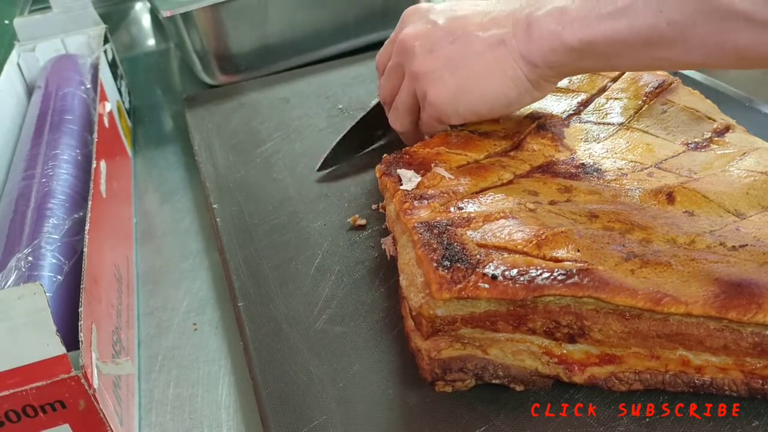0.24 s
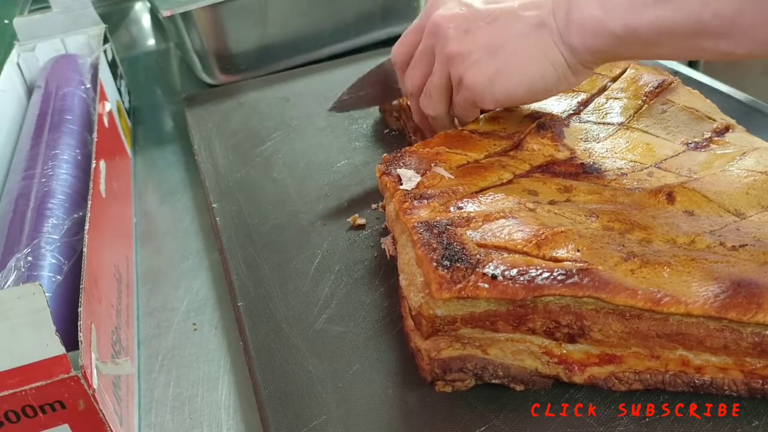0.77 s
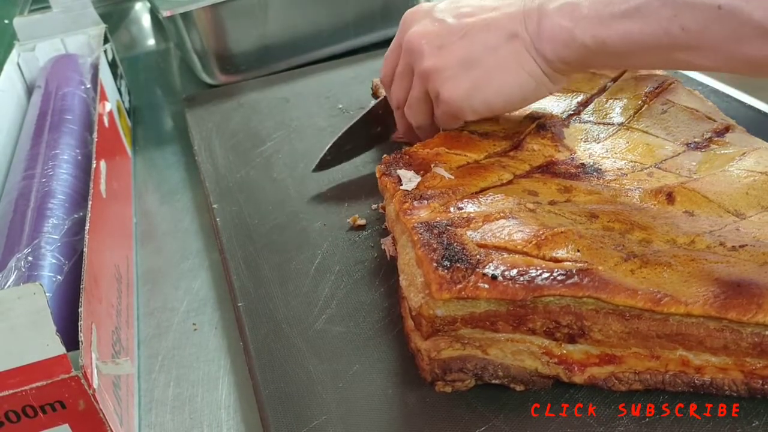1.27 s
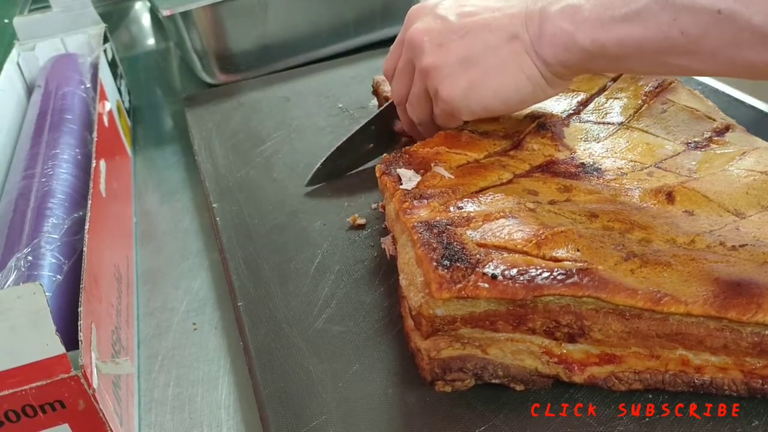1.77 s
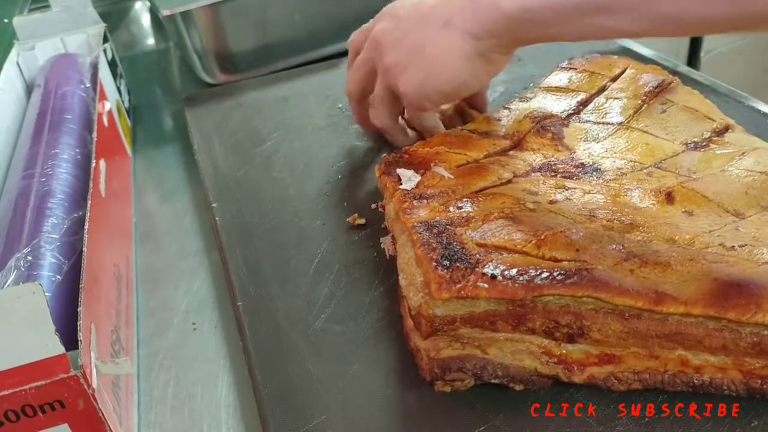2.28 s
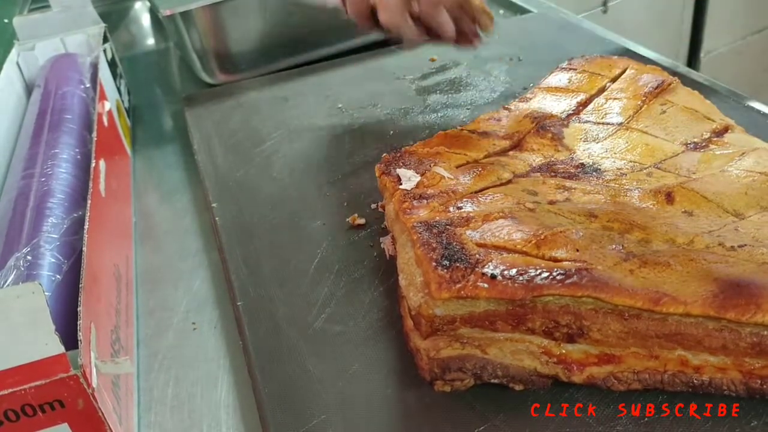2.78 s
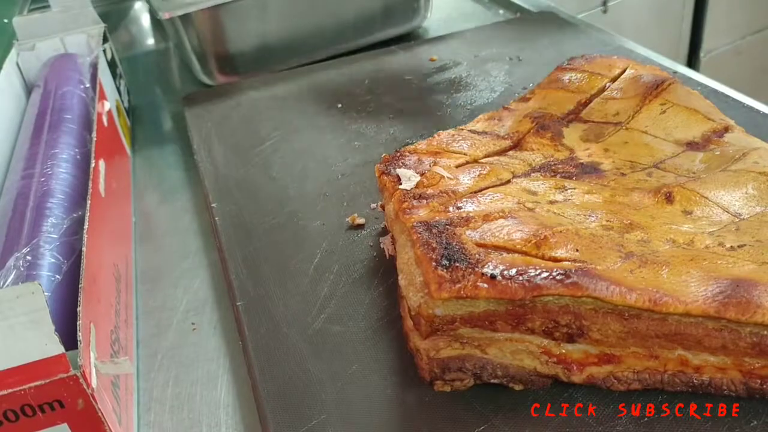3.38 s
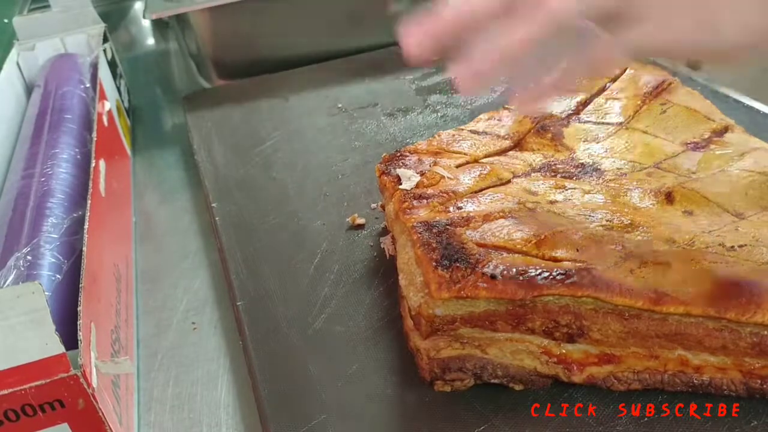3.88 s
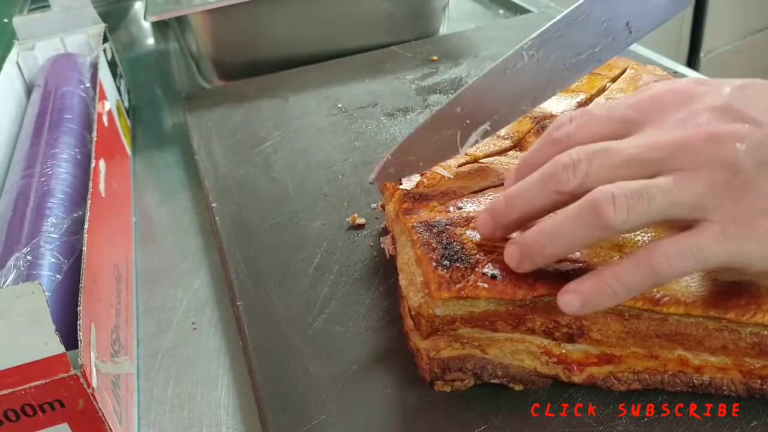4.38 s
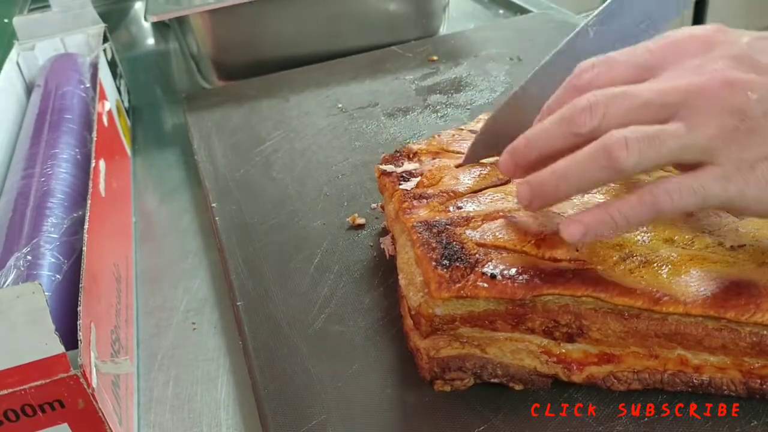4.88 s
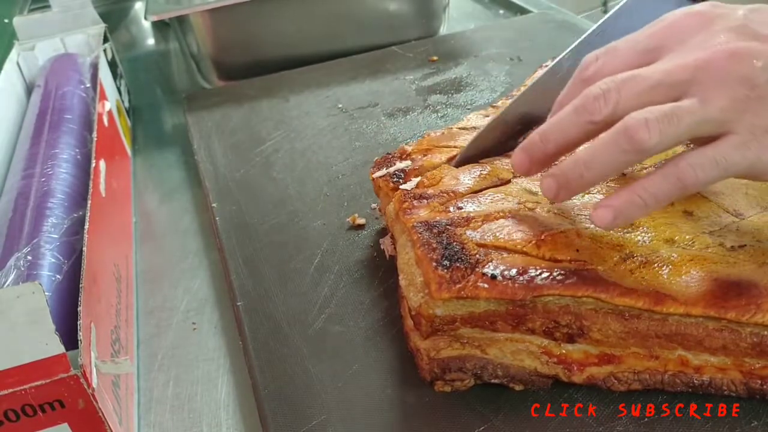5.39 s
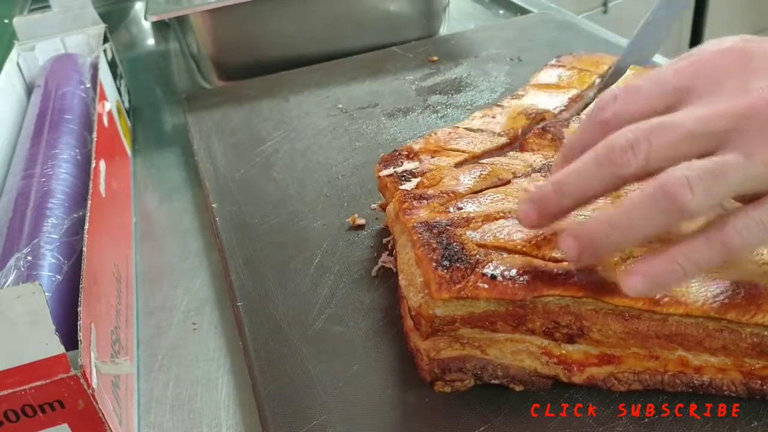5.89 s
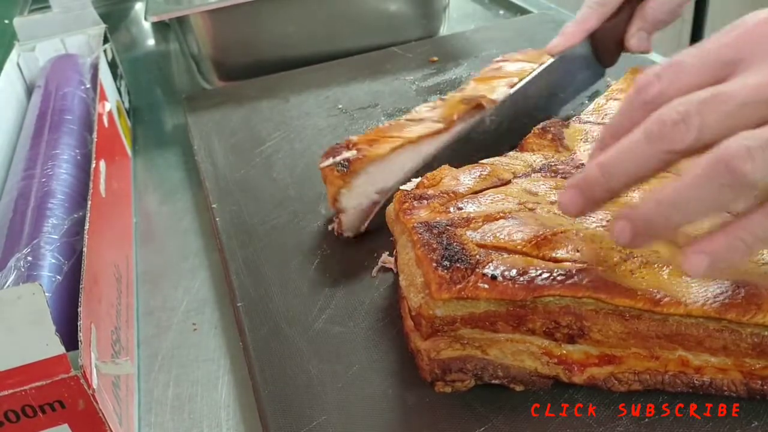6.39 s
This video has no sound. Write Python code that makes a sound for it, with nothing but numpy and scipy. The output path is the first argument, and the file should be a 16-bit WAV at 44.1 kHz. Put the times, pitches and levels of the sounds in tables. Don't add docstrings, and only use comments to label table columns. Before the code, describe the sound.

Close in a hard-walled kitchen, a knife bites crisp pork skin in two gritty crunches with light tray knocks. After a lull the skin cracks loudly with a hard knock, and the slab is shoved with a rumbling thud. Heavier thumps and a slide follow, then two sharp crackling breaks, soft snaps and a last low slide. A cabinet hums steadily.

```python
import sys
import numpy as np
from scipy import signal
from scipy.fft import rfft, irfft, next_fast_len
from scipy.io import wavfile
from scipy.ndimage import uniform_filter1d, minimum_filter1d

SR = 44100
rng = np.random.default_rng(int(sys.argv[2]) if len(sys.argv) > 2 else 0)


def undo_db(level):
    steps = np.asarray(level, float) / 20
    return 10 ** steps


def to_wav(s):
    ch = np.atleast_2d(s).T
    pcm = np.round(np.clip(ch, -1, 1) * 32767)
    wavfile.write(sys.argv[1], SR, pcm.astype(np.int16))


N = 293265

# start in seconds, crackle level in dB,
# time to fade 20 dB in seconds, level of the coarse shards over the crackle in dB.
CRACKS = [(0.006, -56, .12, -8), (0.22, -60, .33, 4), (1.22, -54, .06, -7), (1.264, -55, .1, -6),
          (1.68, -27, .07, 0), (1.72, -32, .055, -6), (1.782, -56, .19, 10), (2.04, -62, .5, 16),
          (2.49, -53.5, .012, -17), (3.502, -51, .17, 12), (3.638, -44, .02, 3), (3.676, -52, .17, 9),
          (3.832, -52, .15, 18), (4.622, -53.5, .04, 11), (4.838, -30, .15, -4), (4.868, -30, .13, -2.5),
          (5.09, -38.5, .035, 4), (5.12, -57, .23, 3), (5.292, -55, .16, -1.5)]
CRACK_RISE_S, CRACK_TOP_DB = .012, -11
# time of full pressure in seconds, crackle level in dB, time to swell 20 dB
# in seconds, time to fade 20 dB in seconds, level of the coarse shards over the crackle in dB.
STROKES = [(0.19, -40.5, .033, .033, 6), (0.442, -37.5, .045, .07, 5), (0.5, -54, .18, .18, 4.5),
           (1.2, -75, .55, .2, 2), (1.41, -57, .06, .4, 0), (1.666, -52.5, .085, .06, 2),
           (1.99, -36.5, .035, .04, 2), (2.44, -76, .03, .2, -8), (2.61, -54.5, .14, .09, 8),
           (3.0, -78, .04, .17, 2), (3.37, -66, .085, .1, -8), (3.426, -48.5, .043, .12, 8.5),
           (3.878, -46, .1, .12, 8), (4.16, -60, .09, .14, 22), (4.532, -73, .03, .3, 0),
           (4.76, -67, .6, .3, -4), (5.506, -64, .08, .04, -16), (5.61, -58.5, .046, .3, 1),
           (5.7, -58, .2, .1, 4), (5.854, -61, .15, .2, 5), (5.96, -63, .2, .3, 9),
           (6.402, -54.5, .18, .6, 8), (6.63, -54, .5, .1, 6)]
STROKE_TOP_DB, TOP_PER_DB = -14, .3
COARSE_LINGERS, TOP_LINGERS = 1.15, .7
# frequency in Hz, density in dB per Hz.
FINE_CRUST = [(2500, -19.5), (3600, -8), (4300, -18.5), (5200, -8.5), (6500, -4), (7800, -2.5),
              (8900, -3.5), (9600, -10.5), (10500, -11.5), (12000, -15), (13500, -36.5)]
# frequency in Hz, density in dB per Hz.
COARSE_SHARDS = [(300, -35), (600, 1), (1000, -1), (1500, 2.5), (2500, 1), (3600, -8), (4500, -13.5),
                 (6000, -38.5)]
# frequency in Hz, density in dB per Hz.
THIN_TOP = [(11000, -36.5), (12500, -3), (13500, 0), (14500, -3), (15400, 2), (16200, -19)]

# start in seconds, peak level in dB, shard pitch in Hz,
# level of the dull part over the peak in dB.
SNAPS = [(0.1661, -29.5, 1220, -28.5), (0.4394, -18, 1220, -9), (0.4554, -23, 8570, -15),
         (1.2198, -44.5, 8700, -12.5), (1.264, -31, 1660, 3), (1.394, -41, 6930, -15.5),
         (1.648, -33.5, 1600, 1.5), (1.9781, -25, 2240, -7.5), (2.1086, -37.5, 1460, -16),
         (2.1739, -46.5, 1270, -8), (2.319, -53, 1470, 4.5), (2.594, -39, 1260, -5),
         (2.8482, -62, 1420, 15.5), (3.1837, -65.5, 1480, 18), (3.373, -54, 2320, 8),
         (3.4032, -36, 1410, 2.5), (4.6219, -42.5, 6430, -1), (4.7364, -47, 1180, -9),
         (5.0468, -29.5, 2380, 4), (5.085, -28, 2530, -21.5), (5.294, -42.5, 6670, -2),
         (5.4953, -58, 1480, -13), (5.5862, -43.5, 1330, -6), (5.8642, -39.5, 8050, 0),
         (6.0579, -37, 2510, -9), (6.332, -55, 1350, -6.5), (6.393, -39, 1700, -38),
         (6.5123, -30.5, 1360, -11)]
SNAP_PAN_DB_PER_OCTAVE, SNAP_MIDDLE_HZ = -5, 1500

# start in seconds, peak level in dB, low ring in Hz, edge over the blow in dB,
# hardness as the high part over the low part in dB.
KNOCKS = [(0.2, -26.5, 345, -24.5, 1), (0.417, -34, 346, -5, -6), (1.68, -14, 187, -8.5, 1),
          (2.023, -20, 229, -37, -10.5), (2.169, -37, 148, -16, -5.5), (2.497, -35.5, 255, -19, -1.5),
          (2.638, -34, 188, -30, -19), (3.428, -32, 188, -7.5, 1), (3.501, -24.5, 237, -20, -8),
          (3.637, -23, 217, -11, -4.5), (3.823, -12, 253, -42, -22.5), (3.865, -18, 258, -24, -18),
          (4.118, -17, 369, -16.5, 2)]
SOFT_RING_HZ, HARD_LIFT_HZ = 470, 230
# frequency in Hz, level in dB, time to die 60 dB in seconds if undamped; #
# knocks() caps it at .3 s and plays about half of that.
TRAY_MODES = [(172, -7.5, 0.36), (547, 8.5, 0.39), (693, 1, 0.25), (776, 18, 0.03), (980, -46, 0.17),
              (1170, -35.5, 0.41), (1330, -50, 0.3), (1610, -36, 1.2), (1776, -13.5, 0.18),
              (2480, -24, 0.25)]
# frequency in Hz, density in dB per Hz.
SOFT_THUMP = [(60, -38.5), (120, -10), (200, 1.5), (350, -1.5), (500, -6.5), (800, -42)]
# frequency in Hz, density in dB per Hz.
HARD_CHATTER = [(250, -27.5), (480, -3), (770, -2), (1100, -1.5), (1500, -3.5), (1900, -12), (2400, -18.5),
                (3800, -21.5), (5500, -37.5)]

# time of the peak in seconds, rumble level in dB, time to
# swell 20 dB in seconds, time to fade 20 dB in seconds, scuff level over the rumble in dB.
SHOVES = [(0.202, -35.5, .08, .15, 8), (0.434, -38.5, .05, .09, 10), (0.516, -48, .1, .13, -11),
          (2.034, -27.5, .08, .055, 0), (2.155, -47, .03, .2, 7), (2.208, -43, .15, .05, -22),
          (2.495, -44, .02, .13, -14), (2.625, -50, .04, .09, -7), (3.452, -43, .1, .2, 9.5),
          (3.53, -34, .17, .14, -2.5), (3.638, -35, .05, .1, 10), (6.446, -37, .18, .09, -2)]
# time of the peak in seconds, rumble level in dB, time to
# swell 20 dB in seconds, time to fade 20 dB in seconds, scuff level over the rumble in dB.
SLIDES = [
    (2.336, -47, .3, .08, -8),
    (3.68, -30, .1, .085, -7.5),
    (3.824, -27.5, .01, .22, -1),
    (6.52, -34, .06, .3, -7),
    (6.4, -44, .1, .5, 0),
]
SHOVE_THUD_DB, SLIDE_THUD_DB = -3, -24
# frequency in Hz, density in dB per Hz.
TRAY_RUMBLE = [(90, -31), (140, -14.5), (185, 4), (250, 0), (300, -1.5), (380, -11.5), (600, -39.5)]
# frequency in Hz, density in dB per Hz.
SLAB_SCUFF = [(250, -32), (400, 7), (600, 3), (900, 3.5), (1300, -7), (2000, -32.5)]
# frequency in Hz, density in dB per Hz.
BENCH_THUD = [(25, -35), (50, -5.5), (95, 14.5), (125, 2), (180, -45)]

# frequency in Hz, time to die 60 dB in seconds.
KITCHEN_T60 = [(100, 0.34), (330, 0.34), (870, 0.39), (2300, 0.28), (6000, 0.4), (14000, 0.19)]

# frequency in Hz, density in dB per Hz.
FAN_AIR = [(12, -67.5), (20, -44.5), (102, -4), (149, -14), (184, -7.5), (235, -6), (268, -16.5),
           (307, -15), (615, -23.5), (685, -18), (783, -23.5), (1490, -28.5), (3150, -75), (6480, -54.5),
           (12000, -62), (15600, -97.5), (22000, -120)]
AIR_DB = -49
# frequency in Hz, level in dB.
MOTOR_LINES = [(91.5, -56), (183.0, -49.5), (360.7, -69), (393.0, -70), (468.3, -73), (694.4, -68.5),
               (748.3, -66), (1491, -74.5)]
# frequency in Hz, left-right correlation from -1 to 1.
AIR_LIKENESS = [(60, 0.99), (180, 0.95), (550, 0.38), (1650, -0.25), (4970, 0.04), (15000, 0.13)]

# frequency in Hz, left over right in dB.
PORT_TILT = [(60, -1), (300, -2), (1000, -1), (2400, -0.6), (4400, .5), (6500, 5), (7800, -8), (8900, -12),
             (10000, -9.5), (12000, -2.5), (15000, -1)]
# frequency in Hz, threshold in dB.
GATE_THRESHOLD = [(1500, -62.5), (2200, -18.5), (3500, -5), (4400, -12), (6000, -29), (9000, -14),
                  (10500, -17.5), (12000, -19.5), (14000, -16.5), (16000, -16)]


def sawing():
    rows = [(s, db, CRACK_RISE_S, fade_s, over_db, CRACK_TOP_DB) for s, db, fade_s, over_db in CRACKS]
    rows += [(*row, STROKE_TOP_DB + TOP_PER_DB * (row[1] + 45)) for row in STROKES]
    s, db, rise_s, fade_s, coarse_db, top_db = np.transpose(rows)
    fine = swells(s, db, rise_s, fade_s)
    coarse = swells(s, db + coarse_db - 2.5, rise_s, COARSE_LINGERS * fade_s)
    top = swells(s, db + top_db + 5, rise_s, TOP_LINGERS * fade_s)
    shared, left, right = (grit(per_s=2500, spread_db=2.5, clump_db=2.5) for _ in range(3))
    out = []
    for breaks in (shared + 0.98 * left, shared + 1.04 * right):
        crackle = fine * coloured(breaks, FINE_CRUST)
        crackle += coarse * coloured(breaks, COARSE_SHARDS)
        crackle += top * coloured(breaks, THIN_TOP)
        out.append(crackle)
    return np.array(out) * undo_db(-7.5)


def snaps():
    out, t = np.zeros((2, N)), np.arange(2500) / SR
    tick_colour = [(1500, -25.5), (3000, -7), (5000, -5.5), (8000, -1), (15000, -20), (16500, -58.5)]
    for s, db, shard_hz, dull_db in SNAPS:
        pan_db = SNAP_PAN_DB_PER_OCTAVE * np.log2(shard_hz / SNAP_MIDDLE_HZ)
        burst = rng.standard_normal(len(t)) * undo_db(-60 * t / 0.043) * np.minimum(t / 0.0013, 1)
        tick = coloured(burst, tick_colour)
        shard = undo_db(2.5) * ring(t, shard_hz, 0.026)
        dull = undo_db(dull_db) * coloured(burst, COARSE_SHARDS)
        add(out, s, panned(undo_db(db - 14) * (tick + shard + dull), pan_db))
    return out


def knocks():
    out, t = np.zeros((2, N)), np.arange(8000) / SR
    tray = sum(undo_db(db) * ring(t, hz, 0.52 * min(t60, .3)) for hz, db, t60 in TRAY_MODES)
    edge_colour = [*FINE_CRUST[:-1], (15000, -21), (16000, -41)]
    chip_fade = undo_db(-60 * t / 0.014)
    edge_fade = chip_fade + undo_db(-19 - 60 * t / 0.22)
    for s, db, low_hz, edge_db, hard_db in KNOCKS:
        high_hz = SOFT_RING_HZ + HARD_LIFT_HZ * undo_db(hard_db)
        thump, shared, left, right = rng.standard_normal((4, len(t)))
        soft = undo_db(-10) * coloured(thump * undo_db(-60 * t / 0.11), SOFT_THUMP)
        soft += undo_db(-3.5) * ring(t, low_hz, 0.066)
        blow = []
        for chatter in (shared + 1.2 * left, shared + 1.12 * right):
            hard = undo_db(-5.5) * coloured(chatter * undo_db(-60 * t / 0.088), HARD_CHATTER)
            hard += undo_db(-6) * ring(t, high_hz, 0.04) + undo_db(-19.5) * tray
            edge = coloured(chatter * edge_fade, edge_colour)
            edge += undo_db(-3.5) * coloured(chatter * chip_fade, COARSE_SHARDS)
            blow.append(soft + undo_db(hard_db) * hard + undo_db(edge_db - 2) * edge)
        attack = np.minimum(t / 0.00068, 1)
        add(out, s + .003, undo_db(db + 1.0) * np.array(blow) * attack)
    return out


def drag():
    rows = [(*row, SHOVE_THUD_DB) for row in SHOVES] + [(*row, SLIDE_THUD_DB) for row in SLIDES]
    s, db, rise_s, fade_s, scuff_db, thud_db = np.transpose(rows)
    slips = grit(per_s=1200, spread_db=2.5, clump_db=2.5)
    rumble = swells(s, db, rise_s, fade_s) * coloured(slips, TRAY_RUMBLE)
    scuff = swells(s, db + scuff_db - 3.6, rise_s, fade_s) * coloured(slips, SLAB_SCUFF)
    thud = swells(s, db + thud_db - 2.0, rise_s, fade_s) * coloured(slips, BENCH_THUD)
    return panned(undo_db(-4.5) * (rumble + scuff + thud), 0)


def kitchen(x):
    taps = np.zeros((2, SR))
    at = np.arange(200, SR - 20, 20) + rng.integers(0, 20, (2, (SR - 201) // 20))
    np.put_along_axis(taps, at, rng.choice([-1., 1.], at.shape), 1)
    hz, t, z = signal.stft(taps, SR, nperseg=512)
    same = np.clip(read([(150, 0.89), (500, 0.25), (1500, 0.033)], hz), 0, 1)[:, None]
    z = np.array([z[0], same * z[0] + np.sqrt(1 - same ** 2) * z[1]])
    dying = undo_db(-60 * t / read(KITCHEN_T60, hz)[:, None])
    tail = signal.istft(z * dying, SR, nperseg=512)[1]
    return signal.fftconvolve(x.mean(0)[None], tail / np.linalg.norm(tail[0]), axes=1)[:, :N]


def cabinet():
    frames, hz = N // 512 + 5, np.fft.rfftfreq(2048, 1 / SR)
    a, b, c, d, patches = rng.standard_normal((frames, 1025, 5)).T
    patches = evened(uniform_filter1d(uniform_filter1d(patches, 14, 0), 6, 1))
    same = np.clip(read(AIR_LIKENESS, hz), -1, 1)[:, None]
    left, other = a + 1j * b, c + 1j * d
    z = np.array([left, same * left + np.sqrt(1 - same ** 2) * other])
    z *= undo_db(read(FAN_AIR, hz)[:, None] + 0.5 * patches)
    air = undo_db(AIR_DB) * evened(signal.istft(z, nperseg=2048, noverlap=1536)[1][:, :N])
    t = np.arange(N) / SR
    motor = np.zeros(N)
    for line_hz, db in MOTOR_LINES:
        level, phase = (evened(uniform_filter1d(rng.standard_normal(N), 5000)) for _ in range(2))
        motor += undo_db(db - 0.5 + 4.4 * level) * np.sin(2 * np.pi * line_hz * t + 0.2 * phase)
    return air + motor


def grit(per_s, spread_db, clump_db):
    size = undo_db(spread_db * np.minimum(rng.exponential(1, N), 5)) * rng.choice([-1, 1], N)
    clumps = evened(uniform_filter1d(rng.standard_normal(N), 300))
    breaks = rng.random(N) < per_s / SR
    return evened(size * breaks * undo_db(clump_db * clumps))


def swells(s, db, rise_s, fade_s):
    at = np.arange(0, N + 32, 32)
    t = at[:, None] / SR - s
    level_db = db - 20 * np.maximum(-t / rise_s, t / fade_s)
    return np.interp(np.arange(N), at, np.sqrt((undo_db(level_db) ** 2).sum(1)))


def ring(t, hz, t60):
    return np.sin(2 * np.pi * hz * t) * undo_db(-60 * t / t60)


def coloured(x, points):
    points = [(points[0][0] / 3, -70), *points, (max(2 * points[-1][0], SR / 4), -90)]
    log_gain = np.log(undo_db(read(points, abs(np.fft.fftfreq(8192, 1 / SR)))))
    taps = np.fft.ifft(np.exp(np.conj(signal.hilbert(log_gain)))).real[:4096]
    return signal.oaconvolve(x, taps / np.linalg.norm(taps))[:len(x)]


def read(points, hz):
    f, value = np.transpose(points)
    return np.interp(np.log(hz + 1), np.log(f + 1), value)


def evened(x):
    return x / np.sqrt(np.mean(x ** 2) + 1e-20)


def panned(x, pan_db):
    return np.array([x * undo_db(pan_db / 2), x * undo_db(-pan_db / 2)])


def add(mix, s, sound):
    part = mix[:, round(s * SR):][:, :sound.shape[1]]
    part += sound[:, :part.shape[1]]


def scene():
    work = sawing() + snaps() + knocks() + drag()
    return undo_db(1.5) * work + undo_db(-2.5) * kitchen(work) + cabinet()


def gate(x):
    hz, t, z = signal.stft(x, SR, nperseg=1024)
    power = (abs(z) ** 2).mean(0)
    power = uniform_filter1d(uniform_filter1d(power, size=4, axis=0), size=4, axis=1)
    level_db = 10 * np.log10(abs(power) + 1e-16)
    heard_db = level_db - 200 * (hz < 2600)[:, None]
    masker_db = -minimum_filter1d(-heard_db, size=100, axis=0)
    blocks = rng.standard_normal((len(t) // 5 + 1, len(hz) // 5 + 1)).T
    whim = np.kron(blocks, np.ones((5, 5)))[:len(hz), :len(t)]
    whim_db = read([(3000, 5.5), (9000, 5.5), (11000, 9.3), (16000, 13.0)], hz)[:, None] * whim
    limit_db = np.maximum(-88, masker_db - 1) + read(GATE_THRESHOLD, hz)[:, None] + whim_db
    open_share = 1 / (1 + np.exp(np.clip((limit_db - level_db) / 2.4, -30, 30)))
    return signal.istft(z * (0.022 + 0.96 * open_share), SR, nperseg=1024)[1][:, :N]


def top_cut(x):
    return signal.sosfilt(signal.butter(12, 16650, fs=SR, output="sos"), x)


def record(dry):
    size = next_fast_len(N)
    hz = np.fft.rfftfreq(size, 1 / SR)
    half = undo_db(read(PORT_TILT, hz) / 2) * np.exp(-1j * np.pi * hz * 2e-5)
    edges = undo_db(read([(12, -15), (35, 2), (16000, -1), (16500, -69)], hz))
    ports = irfft(rfft(dry, size) * edges * np.array([half, 1 / half]), size)[:, :N]
    return top_cut(gate(ports))


dry = scene()
out = record(dry)
to_wav(out)
```